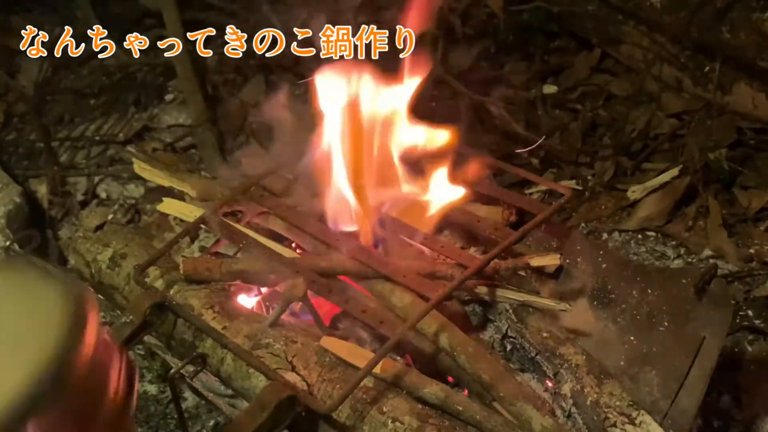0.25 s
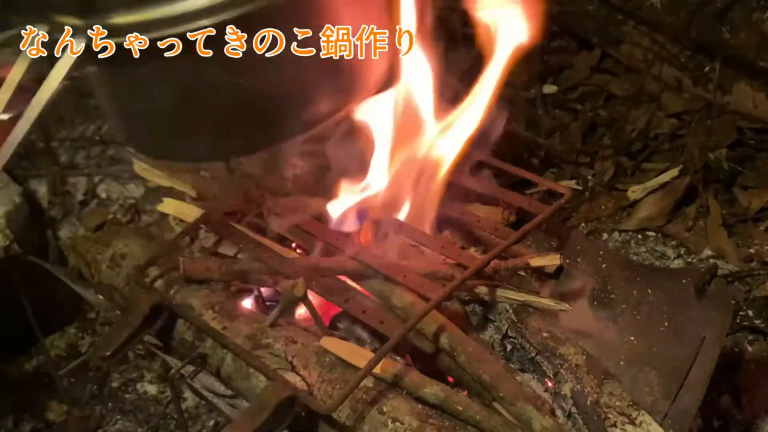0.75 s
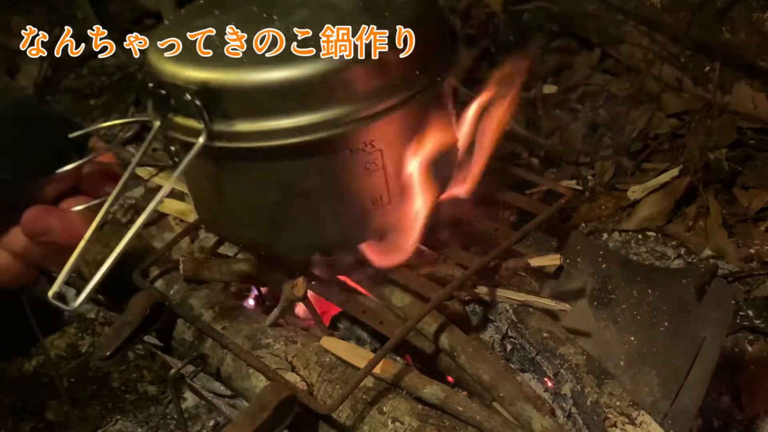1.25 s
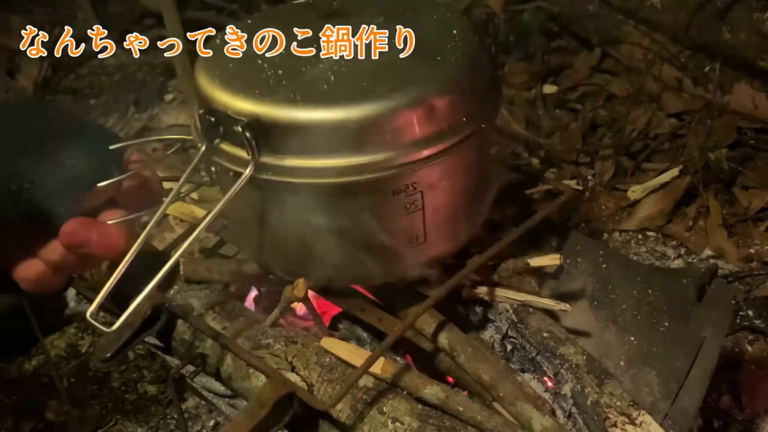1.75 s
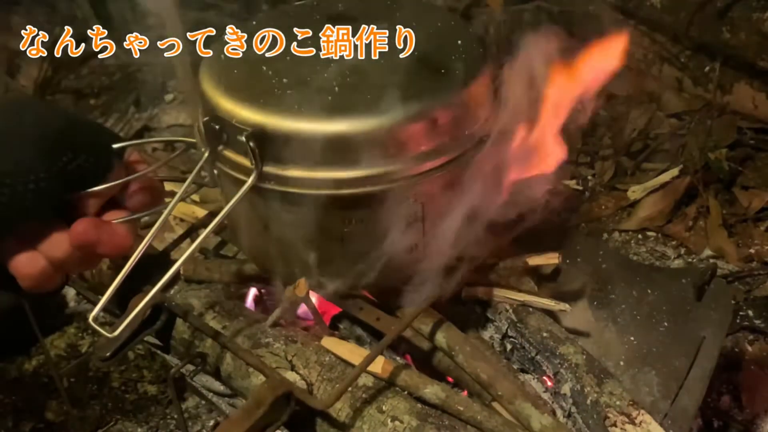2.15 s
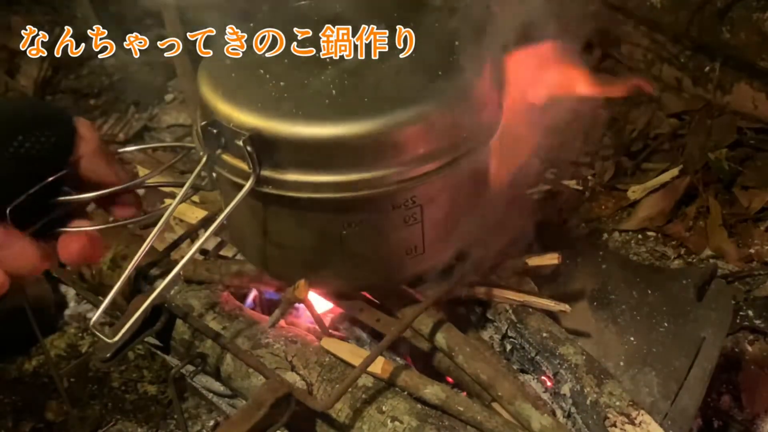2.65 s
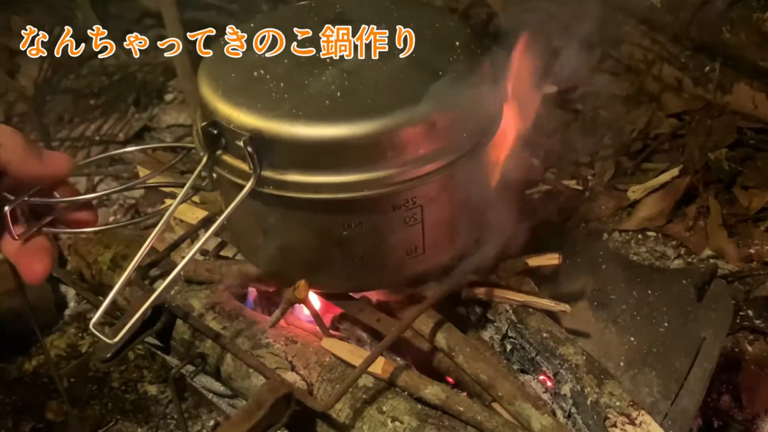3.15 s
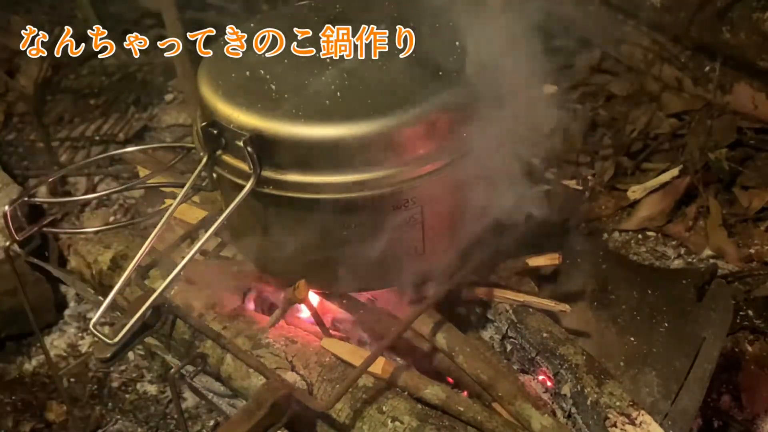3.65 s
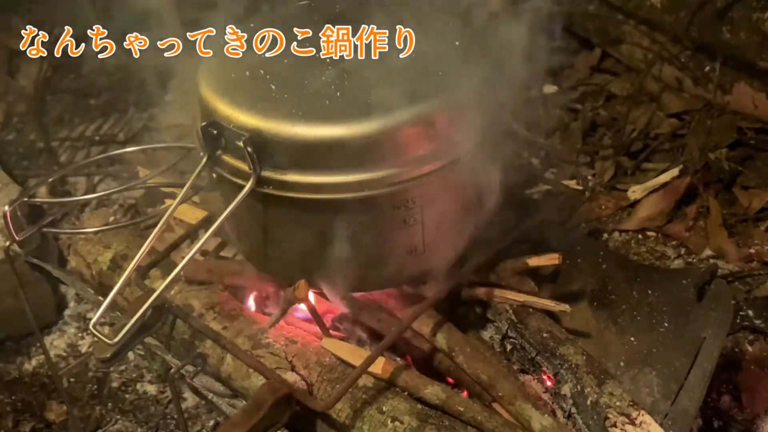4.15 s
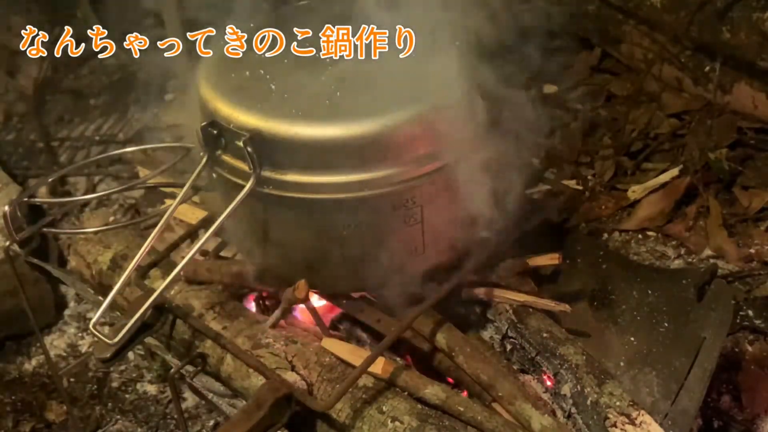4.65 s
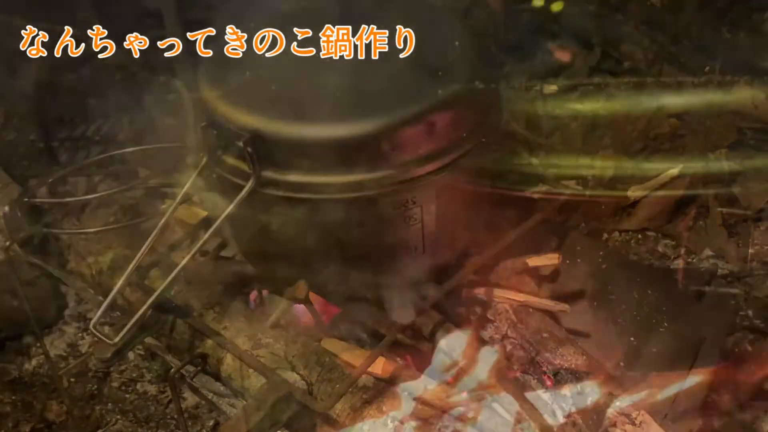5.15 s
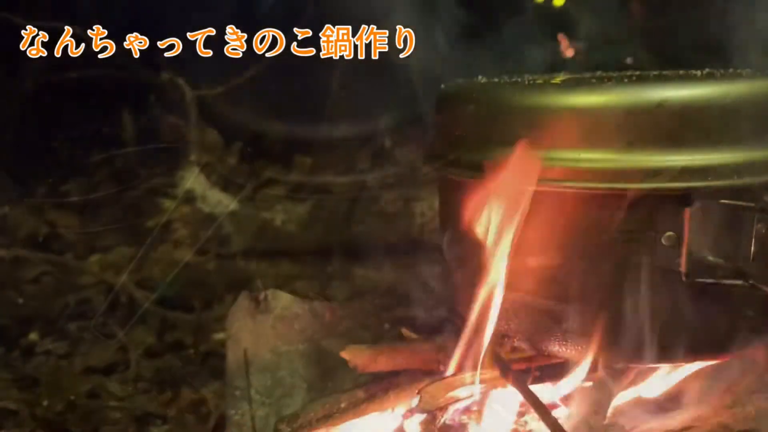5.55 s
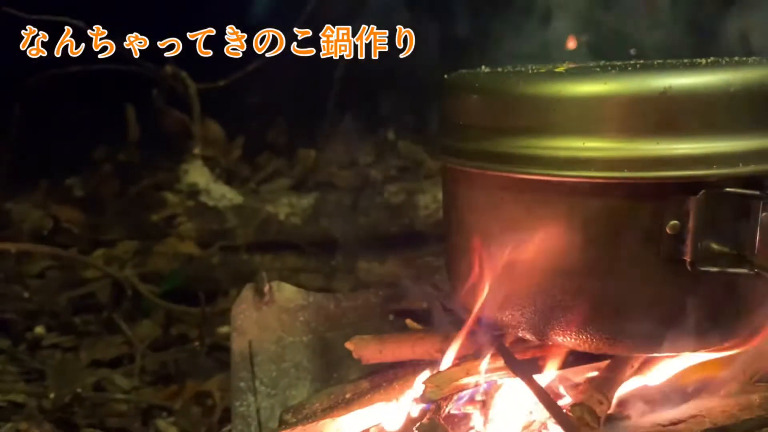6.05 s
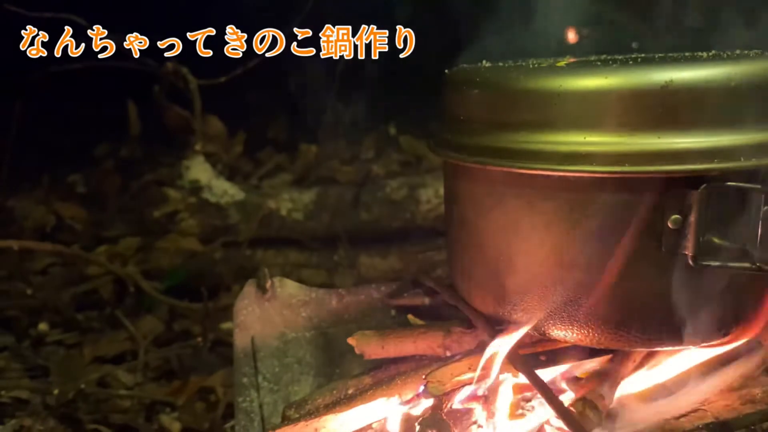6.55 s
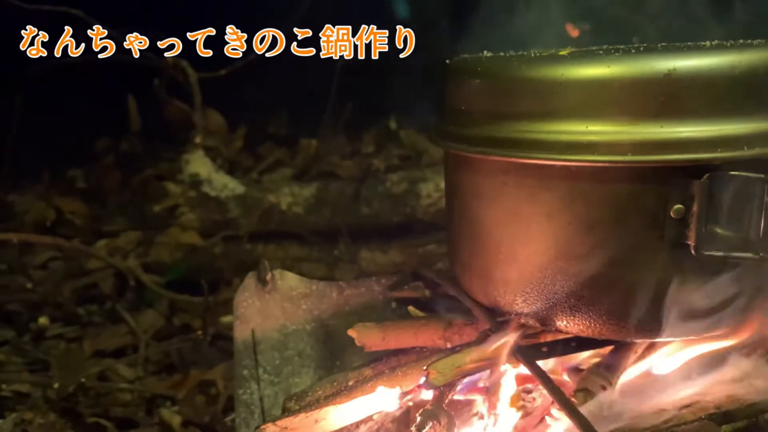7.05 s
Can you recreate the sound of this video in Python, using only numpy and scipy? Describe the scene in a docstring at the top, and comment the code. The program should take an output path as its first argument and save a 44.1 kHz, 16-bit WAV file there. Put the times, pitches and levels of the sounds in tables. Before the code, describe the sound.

A small wood fire flutters, hisses and pops under trilling night crickets, with a soft pot clunk and settling sticks.

```python
"""Flames flutter and sap hisses and pops in a small wood fire, close to a two-port microphone.
Behind it lie the hush of the night woods and crickets stroking their wings, one near, many far off.
A pot rings as it is set on the grate, its water slops, and burning sticks settle with soft thuds.
Near five seconds the view fades to a closer one of the flames, with another cricket nearby."""
import sys
import numpy as np
from scipy import signal
from scipy.fft import rfft, irfft, next_fast_len
from scipy.io import wavfile
from scipy.ndimage import uniform_filter1d

SR = 44100
rng = np.random.default_rng(int(sys.argv[2]) if len(sys.argv) > 2 else 0)


def to_wav(sig):
    """Store sig (one row per channel, or 1-D mono) as 16-bit WAV at the path in sys.argv[1].

    Samples outside -1..1 are clipped; the rate is SR.
    """
    pcm = np.clip(np.atleast_2d(sig), -1, 1) * 32767
    pcm = np.round(pcm).astype(np.int16)
    wavfile.write(sys.argv[1], SR, pcm.T)  # frames by channels


N = 321930
TIME_S = np.arange(N) / SR
FADE_START_S, FADE_END_S = 5, 5.48


def amp(db):
    """dB to gain."""
    return 10 ** (np.asarray(db) / 20)


def unit_rms(x):
    """Scales to rms 1."""
    return x / np.sqrt(np.mean(x ** 2) + 1e-20)


def at_hz(points, hz):
    """Interpolates over log frequency."""
    freqs, values = np.transpose(points)
    return np.interp(np.log(hz + 1), np.log(freqs + 1), values)


def envelope(table, column):
    """One dB column of a time table as gain per sample."""
    rows = np.array(table)
    return amp(np.interp(TIME_S, rows[:, 0], rows[:, column]))


def views(wide_db, close_db):
    """Gain across the fade from wide to close view, summed in power."""
    close = np.clip((TIME_S - FADE_START_S) / (FADE_END_S - FADE_START_S), 0, 1)
    return np.hypot(amp(wide_db) * (1 - close), amp(close_db) * close)


def pan(db):
    """Channel gains; pan is left minus right."""
    return amp([[db / 2], [-db / 2]])


def add(mix, start_s, sound, pan_db=0):
    """Mixes a panned sound in."""
    part = mix[:, max(round(start_s * SR), 0):][:, :np.shape(sound)[-1]]
    part += (sound * pan(pan_db))[:, :part.shape[1]]


def colour(x, spectrum):
    """Filters by a spectrum in dB."""
    size = next_fast_len(x.shape[-1])
    gain = amp(at_hz(spectrum, np.fft.rfftfreq(size, 1 / SR)))
    return irfft(rfft(x, size) * gain, size)[..., :x.shape[-1]]


def ports(x, lag_s=1 / 4450, offset_cycles=-.09):
    """The fire reaches the left port late; the ports also differ by part of a cycle."""
    size = next_fast_len(x.shape[-1])
    hz = np.fft.rfftfreq(size, 1 / SR)
    cycles = hz * lag_s + offset_cycles * np.tanh(hz / 2000)
    left_late = np.exp(-2j * np.pi * cycles * np.array([[1], [0]]))
    return irfft(rfft(x, size) * left_late, size)[:, :x.shape[-1]]


def noise(spectrum, coherence, size, patchy_db, flicker_db):
    """Stereo noise with drifting patches and flicker; coherence is (frequency [Hz], L-R correlation)."""
    frames, hz = 4 * N // size + 5, np.fft.rfftfreq(size, 1 / SR)
    a, b, c, d, patches = rng.standard_normal((frames, len(hz), 5)).T
    patches = uniform_filter1d(patches, size=size // 80, axis=0)
    patches = unit_rms(uniform_filter1d(patches, size=8, axis=1))
    flicker = unit_rms(uniform_filter1d(rng.standard_normal(frames), size=3))
    shared = np.clip(at_hz(coherence, hz), -1, 1)[:, None]
    left = a + 1j * b
    right = shared * left + np.sqrt(1 - shared ** 2) * (c + 1j * d)
    gain = amp(at_hz(spectrum, hz)[:, None] + patchy_db * patches + flicker_db * flicker)
    pair = signal.istft(np.array([left, right]) * gain, nperseg=size, noverlap=3 * size // 4)[1][:, :N]
    return pair / np.sqrt(np.mean(pair.mean(0) ** 2))


# Flame spectra: (frequency [Hz], relative density [dB])
THROB_SPECTRUM = [(25, -16), (45, 9), (65, 19.5), (85, 11.5), (120, -81)]
FLUTTER_SPECTRUM = [(65, -5), (95, 5), (125, 9.5), (170, 4), (210, -0.5), (300, -81)]
ROAR_SPECTRUM = [(120, 7), (200, 9.5), (300, 10.5), (400, 3.5), (600, -49)]
# Flame levels: (time [s], throb [dB], flutter [dB])
FLAME_LEVELS = [(0, -47.5, -46.5), (.35, -56, -47), (.8, -45.5, -50.5), (1.15, -58, -46), (1.6, -59, -51),
                (1.95, -53, -49.5), (2.3, -61, -47), (2.75, -43.5, -43.5), (3.2, -50, -50),
                (3.5, -47.5, -46.5), (3.95, -61, -50.5), (4.4, -49, -49), (4.85, -57, -52.5),
                (5.3, -57.5, -56), (5.6, -50, -52), (6.2, -47.5, -50.5), (6.5, -62, -56), (6.8, -65, -49.5),
                (7.3, -59, -51)]


def flames():
    """Deep throb, lumpy flutter, and a puffy roar that swells with each steam spurt."""
    throb = noise(THROB_SPECTRUM, [(60, .98), (110, .98)], 2048, patchy_db=0, flicker_db=-3)
    flutter = noise(FLUTTER_SPECTRUM, [(80, .94), (140, .99), (250, .33)], 2048,
                    patchy_db=.44, flicker_db=2.5)
    roar = noise(ROAR_SPECTRUM, [(200, 1), (450, .63)], 2048, patchy_db=-.06, flicker_db=3)
    low = throb * envelope(FLAME_LEVELS, 1) + flutter * envelope(FLAME_LEVELS, 2)
    return low * pan(-1.2) + roar * np.hypot(views(wide_db=-55 - 9.5, close_db=-55), amp(-7.5) * spurts())


# Woods spectrum: (frequency [Hz], relative density [dB])
HUSH_SPECTRUM = [(70, -18), (150, 7.5), (300, 0.5), (600, 3.5), (1300, 4), (2500, -2), (3600, -5.5),
                 (5000, -7.5), (6500, -12.5), (8000, -20.5), (11000, -82), (16500, -40)]
# Woods stereo image: (frequency [Hz], L-R correlation)
HUSH_COHERENCE = [(200, -0.31), (400, -0.37), (1300, -0.26), (2400, -0.11), (4400, 0.24), (8000, -0.25)]


def hush():
    """Wide, smooth wash of the woods; it swells a little with each spurt."""
    wash = noise(HUSH_SPECTRUM, HUSH_COHERENCE, 1024, patchy_db=1.56, flicker_db=.45)
    return wash * np.hypot(views(wide_db=-52.5, close_db=-53), amp(-2.5) * spurts())


# Steam spurts: (start [s], end [s], level [dB])
STEAM_SPURTS = [(-.1, 0.152, -51), (3.518, 3.785, -62), (4.39, 4.598, -53), (5.5, 5.71, -63)]


def spurts(open_s=.14, shut_s=.06):
    """Gain of steam escaping a split in the wood: builds, holds, shuts."""
    return sum(amp(db) * np.clip(np.minimum((TIME_S - start) / open_s, (end - TIME_S) / shut_s) + .5, 0, 1)
               for start, end, db in STEAM_SPURTS)


# Steam and top-hiss spectra: (frequency [Hz], relative density [dB])
STEAM_SPECTRUM = [(3000, -20), (5500, -8), (7500, 5), (9300, 0.5), (11500, -2), (13000, 2), (15000, -7),
                  (16000, -24), (16700, -38)]
SHEEN_SPECTRUM = [(7000, -15), (9500, -33), (12500, -28), (14300, 12), (15000, 19), (15700, 3),
                  (16300, -21), (16700, -30)]
# Steam flow: (time [s], level [dB])
STEAM_LEVELS = [(0, -61), (.8, -68.5), (1.3, -66), (3.5, -64.5), (4.9, -63), (5.6, -57.5), (5.9, -61),
                (6.35, -56), (6.9, -59.5), (7.3, -64.5)]


def sap_fizz(ticks_per_s=150):
    """Steam hisses from the wood, strewn with tiny ticks, under a thin steady hiss near 15 kHz."""
    hiss = noise(STEAM_SPECTRUM, [(3000, .36), (9000, 1)], 256, patchy_db=1.5, flicker_db=-3.2)
    tick_gain = amp(6.9 * np.minimum(rng.exponential(1, N), 5))
    ticks = tick_gain * (rng.random(N) < ticks_per_s / SR) * rng.choice([-1, 1], N)
    flow = np.hypot(envelope(STEAM_LEVELS, 1), spurts())
    steam = (unit_rms(hiss) + amp(-25) * unit_rms(colour(ticks, STEAM_SPECTRUM))) * flow
    sheen = noise(SHEEN_SPECTRUM, [(10000, .98), (14000, .97), (16000, .6)], 256,
                  patchy_db=1.5, flicker_db=.5)
    return ports(steam + amp(-65.5) * sheen)


def singer(hz, blur_hz, stroke_depth, chirp_depth):
    """One far cricket: strokes grouped in chirps, smeared by leaves and distance differently per port."""
    hop = 32
    t = np.arange(N // hop + 2) * hop / SR
    u, v, w = rng.random(3)
    stroke_hz, chirp_hz = 18.86 + 2.87 * w, 1.076 + .4136 * u
    strokes = 1 + stroke_depth * np.sin(2 * np.pi * (stroke_hz * t + u))
    chirps = 1 + chirp_depth * np.sin(2 * np.pi * (chirp_hz * t + v))
    pole = np.exp(-np.pi * blur_hz * hop / SR)
    smear = signal.lfilter([1], [1, -2 * pole, pole ** 2], rng.standard_normal((4, len(t))))
    a, b, c, d = (np.interp(TIME_S, t, path) for path in smear * strokes * chirps)
    cos, sin = np.cos(2 * np.pi * hz * TIME_S), np.sin(2 * np.pi * hz * TIME_S)
    return unit_rms(np.array([a * cos + b * sin, c * cos + d * sin]))


# Far cricket groups: (pitch [Hz], relative level [dB])
CHORUS_SINGERS = [(4050, -8), (4120, -4), (4180, -2), (4230, 0), (4280, -2)]
UPPER_SINGERS = [(4365, 0), (4440, -7), (4545, -7)]
# Highest cricket's chirps: (centre [s], length [s], level [dB])
HIGH_CRICKET_CHIRPS = [(.1, 0.22, -66), (.53, 0.3, -64), (1.17, .25, -68), (1.722, 0.27, -68),
                       (2.27, .25, -67), (2.95, .2, -69), (3.68, 0.24, -67), (4.417, 0.28, -67),
                       (5.36, 0.22, -67), (5.9, .36, -66), (6.3, 0.36, -61.5), (6.83, 0.3, -63),
                       (7.24, .2, -66)]


def far_crickets():
    """A chorus close in pitch, a few singers above it, a low one, and a high one to the right."""
    chorus = unit_rms(sum(amp(db) * singer(hz, 57, .24, .2) for hz, db in CHORUS_SINGERS))
    upper = unit_rms(sum(amp(db) * singer(hz, 70, .5, .4) for hz, db in UPPER_SINGERS))
    chirps = sum(amp(db) * np.cos(np.pi * np.clip((TIME_S - s) / length_s, -.5, .5))
                 for s, length_s, db in HIGH_CRICKET_CHIRPS)
    high = singer(4882, blur_hz=60, stroke_depth=.4, chirp_depth=0) * np.hypot(views(-74, -71), chirps)
    low = singer(4170, blur_hz=80, stroke_depth=.6, chirp_depth=.5) * views(-66, -60.5)
    return low + chorus * views(-55, -58.5) + upper * views(-64.5, -60) + high * pan(-7)


STROKE_S = .03


def stroke(hz, phase_cycles, sweep_hz, left_lead_rad):
    """One wing stroke: a short tone swells and dies while its pitch slides."""
    t = np.arange(round(STROKE_S * SR)) / SR - STROKE_S / 2
    cycles = hz * t + sweep_hz * t ** 2 / (2 * STROKE_S) + phase_cycles
    return np.sin(2 * np.pi * cycles + np.array([[left_lead_rad], [0]])) * np.hanning(len(t))


def leaves(x, t60_s=.25, wet_db=-7.5):
    """Leaves around a cricket smear its strokes."""
    tail = rng.standard_normal((2, SR // 4)) * amp(-60 * TIME_S[:SR // 4] / t60_s)
    return x + amp(wet_db) * signal.oaconvolve(x, tail / np.linalg.norm(tail[0]), axes=1)[:, :N]


# Wing strokes: (centre [s], level [dB], pitch [Hz])
WING_STROKES = [(.023, -43, 4300), (.221, -47, 4295), (.371, -43.5, 4290), (.462, -40, 4285),
                (.51, -44.5, 4285), (.559, -43.5, 4295), (.609, -42, 4285), (.664, -47, 4310),
                (.83, -48, 4190), (.872, -50, 4215), (.916, -47, 4255), (.964, -45.5, 4265),
                (1.018, -41.5, 4280), (1.067, -50, 4300), (1.117, -44.5, 4275), (1.166, -43, 4290),
                (1.22, -41.5, 4290), (1.289, -48, 4210), (1.403, -48, 4180), (1.44, -49, 4155),
                (1.49, -51, 4160), (1.54, -47, 4240), (1.582, -46, 4265), (1.631, -42, 4300),
                (1.679, -45, 4265), (1.73, -43, 4295), (1.776, -42, 4290), (2.058, -49, 4170),
                (2.119, -47, 4240), (2.176, -49, 4265), (2.222, -43, 4285), (2.274, -44, 4280),
                (2.325, -43.5, 4285), (2.624, -46, 4210), (2.664, -43.5, 4265), (2.721, -40.5, 4282),
                (2.769, -40.5, 4283), (2.817, -40, 4295), (2.867, -44.5, 4285), (2.911, -43, 4290),
                (3.078, -49, 4190), (3.148, -50, 4255), (3.205, -49, 4275), (3.246, -48, 4265),
                (3.3, -42.5, 4290), (3.348, -40.5, 4293), (3.394, -42.5, 4275), (3.45, -45.5, 4270),
                (3.615, -46, 4288), (3.697, -44, 4290), (3.74, -46, 4200), (3.79, -48, 4210),
                (3.847, -43.5, 4285), (3.883, -42.5, 4285), (3.934, -43.5, 4295), (3.98, -45.5, 4285),
                (4.126, -49, 4240), (4.208, -49, 4120), (4.265, -49, 4195), (4.309, -49, 4265),
                (4.363, -42, 4285), (4.41, -44.5, 4285), (4.463, -42.5, 4290), (4.51, -42, 4297),
                (4.634, -49, 4300), (4.685, -49, 4290), (4.752, -46, 4160), (4.797, -48, 4205),
                (4.85, -50, 4260), (4.9, -44, 4290), (4.947, -45.5, 4290), (4.992, -47.5, 4295),
                (5.035, -52, 4275)]


def wide_view_cricket():
    """Pure strokes nearby, a little to the right; most chirps start flat."""
    out = np.zeros((2, N))
    for s, db, hz in WING_STROKES:
        phase, side = rng.standard_normal(2)
        tone = stroke(hz, phase, sweep_hz=-50, left_lead_rad=.6)
        add(out, s - STROKE_S / 2, amp(db) * tone, pan_db=-2 + 2.2 * side)
    return out


# Sap pops: (time [s], snap peak [dB], body re snap [dB], treble tilt [dB/octave], step [s])
SAP_POPS = [(0.087, 1.5, -10, -3, 0.00032), (0.215, -24.5, -12, -4, 0.00026),
            (0.3599, -13.5, -21, 4.5, 0.00025), (1.2456, -39, -20, 14, 0.00023),
            (1.3538, -44, -18, 0, 0.00026), (1.3708, -31.5, -18, -3, 0.00022),
            (1.7607, -20, -5, -1, 0.00027), (1.8028, -37, -18, 4, 0.00026), (1.913, -33, -16, 5, 0.00025),
            (2.6289, -33, -17, -5, 0.00027), (2.9137, -28, -18, -8, 0.00028),
            (3.6089, -25.5, -11, -3, 0.00026), (3.768, -32.5, -14, -9, 0.00035),
            (4.54, -27.5, -18, -4, 0.00024), (4.7895, -40, -18, 5, 0.00022),
            (5.4206, -21.5, -8, 0, 0.00024), (5.6084, -26.5, -25, 7, 0.00027),
            (5.658, -34, -12, 5, 0.00032), (5.675, -30.5, -14, 7, 0.00028),
            (6.0372, -31.5, -20, 2, 0.00026), (6.1465, -36, -16, 0, 0.00032), (6.177, -34, -16, 2, 0.00019),
            (6.2347, -35, -15, 4, 0.00025), (6.304, -28, -18, 2, 0.00026), (6.322, -38, -15, 4, 0.00024),
            (6.4083, -34, -12, -6, 0.00029), (6.4528, -3.5, -18.5, 0.5, 0.00019),
            (6.6133, -17, -8.5, 1, 0.0002), (6.7748, -28.5, -3, -3, 0.00027),
            (6.8598, -29.5, -12, 7, 0.00026), (7.2832, -24.5, -19, 2, 0.00024)]
# Crack pulses: the main click, a faint lead-in and quick echoes: (offset [steps], level [dB])
CRACK_STEPS = [(-1, -13), (0, 0), (1, -9), (2.6, -13)]
# Pop filters: (frequency [Hz], gain [dB])
SNAP_SPECTRUM = [(1000, -34), (2000, -11), (3500, -5), (5500, -5), (6800, 1), (7700, -5), (8800, 2),
                 (10500, 3), (12200, -1), (14800, 1), (16000, -2), (16700, -24)]
BODY_SPECTRUM = [(150, 6), (400, -4), (1100, 1.5), (2500, -2.5), (5000, -18)]


def sap_pops(step_scatter=.02, spray_db=-21, spray_t60_s=.014):
    """Wood cracks in one sharp click with a faint lead-in and quick echoes off the ground and the pot; a short
    spray follows."""
    out, t = np.zeros((2, N)), np.arange(-256, 1792) / SR
    spray_gain = amp(spray_db - 60 * abs(t) / spray_t60_s) * (t > 0)
    for s, db, body_db, tilt_db, step_s in SAP_POPS:
        white = rng.standard_normal((3, len(t)))
        crack = sum(amp(step_db) * np.sinc((t - steps * step_s * (1 + step_scatter * jitter)) * SR)
                    for (steps, step_db), jitter in zip(CRACK_STEPS, white[0]))
        spray = (.52 * white[0] + .66 * white[1:]) * spray_gain
        snap = colour(crack + spray, SNAP_SPECTRUM)
        snap = colour(snap, [(4000, -tilt_db), (16000, tilt_db)])
        snap = signal.hilbert(snap).imag  # push, then pull
        body = colour(np.sinc(t * SR) + spray, BODY_SPECTRUM)
        pop = ports(snap) / abs(snap).max() + amp(body_db) * body / abs(body).max()
        add(out, s + t[0] + .0015, amp(db) * pop, pan_db=1.8)
    return out


def blows(events, modes, rise_cycles):
    """Each blow rings the struck object's modes; high ones build up first."""
    out, t = np.zeros((2, N)), TIME_S[:SR // 5]
    for s, db, pan_db in events:
        ring = np.zeros(len(t))
        for hz, mode_db, t60_s in modes:
            rise = 1 - np.exp(-t * hz / rise_cycles)
            decay = amp(mode_db - 60 * t / t60_s)
            ring += rise * decay * np.sin(2 * np.pi * (hz * t + rng.uniform(0, .46)))
        add(out, s, amp(db) * ring / abs(ring).max(), pan_db)
    return out


# Pot contacts: (time [s], peak [dB], pan [dB])
POT_TOUCHES = [(.212, -46, 8), (1.915, -38, -3)]
# Pot modes: (frequency [Hz], level [dB], t60 [s])
POT_MODES = [(564, 7, 0.14), (700, 7, 0.067), (823, 1, 0.061)]


def pot():
    """The pot rings as it touches the grate."""
    return blows(POT_TOUCHES, POT_MODES, rise_cycles=1.2)


# Metal ping: (time [s], peak [dB], pan [dB])
PING_HITS = [(1.415, -47, 0)]
# Ping mode: (frequency [Hz], level [dB], t60 [s])
PING_MODES = [(1700, 0, .06)]


def metal_ping():
    """Metal rings faintly in one mode."""
    return blows(PING_HITS, PING_MODES, rise_cycles=3)


# Stick thuds: (time [s], peak [dB], pan [dB])
STICK_THUDS = [(1.744, -36, -4), (3.949, -42.5, -3), (4.432, -39.5, 3), (4.56, -40, 4), (4.596, -39, -1),
               (4.648, -44, 0), (4.9592, -23.5, 8), (5.044, -43, -8), (5.072, -42.5, 1), (5.1, -42, -3),
               (5.419, -44, .5)]
# Stick modes: (frequency [Hz], level [dB], t60 [s])
STICK_MODES = [(140, -4, 0.05), (285, 7, 0.018), (630, 3, 0.011), (880, -3, 0.007)]


def sticks():
    """Burning sticks settle with low, damped knocks."""
    return blows(STICK_THUDS, STICK_MODES, rise_cycles=1.6)


def glide(start_s, length_s, from_hz, to_hz, db):
    """A soft tone with a linear pitch slide."""
    out, t = np.zeros((2, N)), TIME_S[:round(length_s * SR)]
    cycles = from_hz * t + (to_hz - from_hz) * t ** 2 / (2 * length_s)
    add(out, start_s, amp(db) * np.sin(2 * np.pi * cycles) * signal.windows.tukey(len(t), .6))
    return out


def bubble():
    """Water slops in the pot: one bubble of rising pitch."""
    return glide(start_s=1.945, length_s=.065, from_hz=760, to_hz=1250, db=-54)


def far_call():
    """A faint, falling call far off."""
    return glide(start_s=3.47, length_s=.045, from_hz=4000, to_hz=3780, db=-58)


# Rustles: (start [s], end [s], level [dB])
RUSTLE_SPANS = [(3.538, 3.655, -55), (4.319, 4.636, -58)]
# Rustle spectrum: (frequency [Hz], relative density [dB])
RUSTLE_SPECTRUM = [(1400, -25), (2100, 4), (2600, 5), (3500, -4), (6000, -27)]


def rustle(grain_db=3):
    """Dry rustling in the fire: grainy mid noise swells and fades."""
    out = np.zeros((2, N))
    for start, end, db in RUSTLE_SPANS:
        white = rng.standard_normal((3, SR // 2))[:, :round((end - start) * SR)]
        grains = white[1:] * amp(grain_db * unit_rms(uniform_filter1d(white[0], size=200)))
        swell = signal.windows.tukey(white.shape[1], .5)
        add(out, start, amp(db) * unit_rms(colour(grains, RUSTLE_SPECTRUM)) * swell)
    return out


# Close-view chirps: (first stroke [s], last stroke [s], level [dB])
CLOSE_VIEW_CHIRPS = [(5.54, 5.999, -52.5), (6.257, 6.68, -49.5), (6.956, 7.282, -51)]


def close_view_cricket(pitch_hz=4335, gap_s=.0465, flat_hz=110, warmup_strokes=1.6, scatter_db=1.5):
    """Long chirps to the left start flat and climb to pitch; each stroke slides down."""
    out = np.zeros((2, N))
    for first, last, db in CLOSE_VIEW_CHIRPS:
        times = np.linspace(first, last, num=round((last - first) / gap_s) + 1)
        for k, (s, (detune, phase, force, side)) in enumerate(zip(times, rng.standard_normal((12, 4)))):
            hz = pitch_hz - flat_hz * np.exp(-(k / warmup_strokes) ** 2) + 10 * detune
            tone = stroke(hz, phase, sweep_hz=-240, left_lead_rad=-1.8)
            add(out, s - STROKE_S / 2, amp(db + scatter_db * force) * tone, pan_db=4 + 2 * side)
    return out


def scene():
    """Fire, pot, sticks and crickets over the hush."""
    knocks = pot() + sticks() + metal_ping()
    crickets = leaves(wide_view_cricket() + close_view_cricket()) + far_crickets()
    return flames() + hush() + sap_fizz() + rustle() + sap_pops() + knocks + bubble() + crickets + far_call()


def record(dry, low_cut_hz=40, peak_ceiling=.95, band_limit_hz=16650):
    """The microphone drops the deepest bass, peaks are softly rounded; then the band limit."""
    thinned = signal.sosfilt(signal.butter(4, low_cut_hz, "high", fs=SR, output="sos"), dry)
    rounded = peak_ceiling * np.tanh(thinned / peak_ceiling)
    low_pass = signal.firwin(511, band_limit_hz, window=("kaiser", 9), fs=SR)
    return signal.oaconvolve(rounded, low_pass[None], "same")


dry = scene()
out = record(dry)
to_wav(out)
```